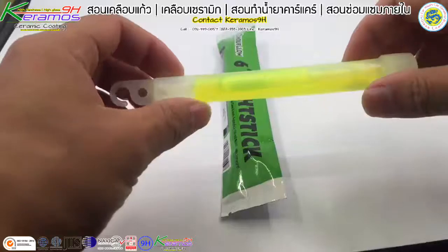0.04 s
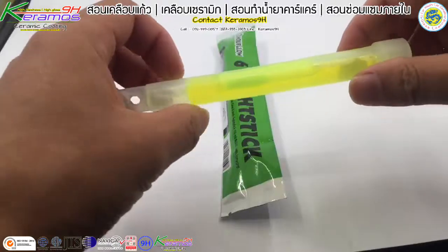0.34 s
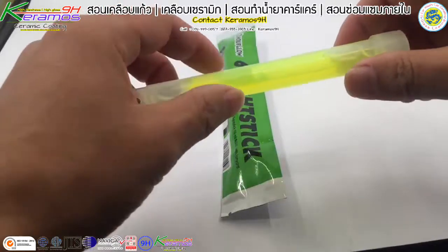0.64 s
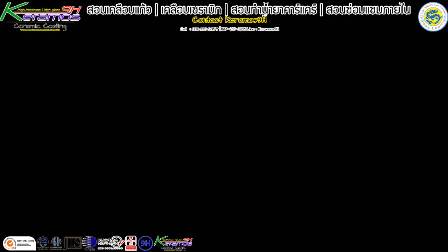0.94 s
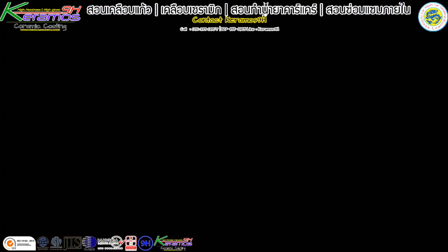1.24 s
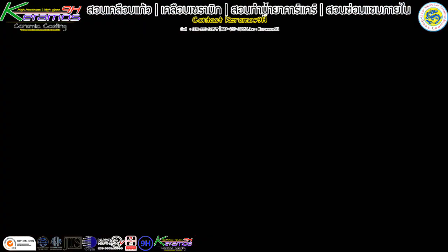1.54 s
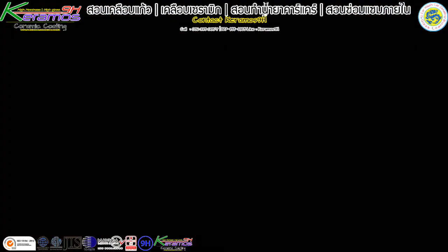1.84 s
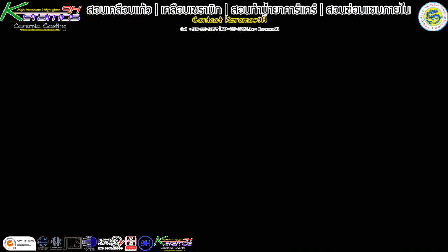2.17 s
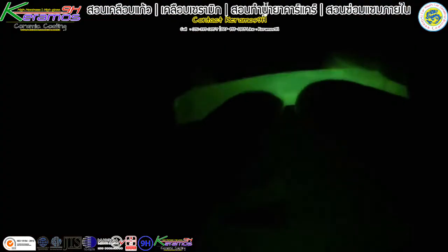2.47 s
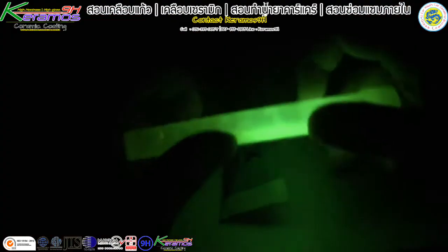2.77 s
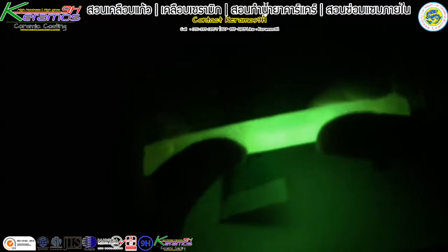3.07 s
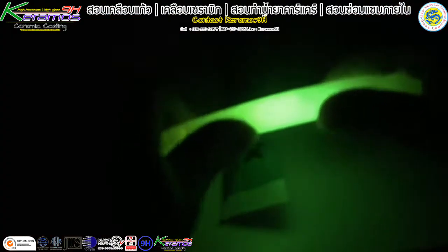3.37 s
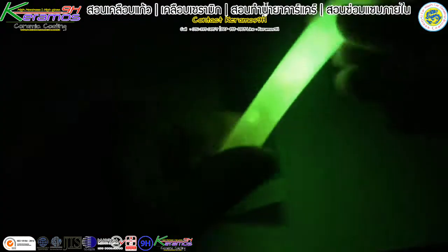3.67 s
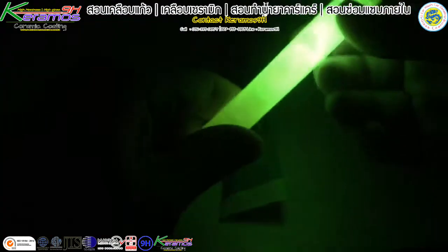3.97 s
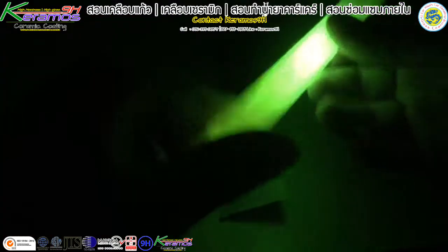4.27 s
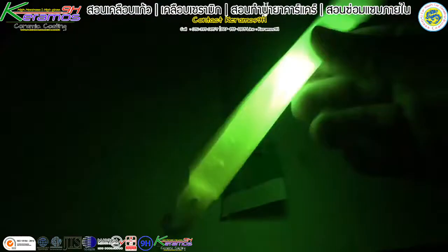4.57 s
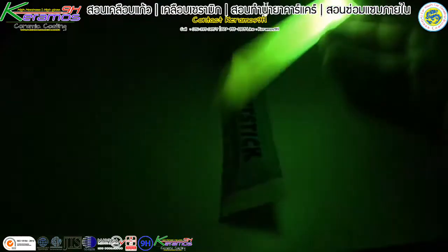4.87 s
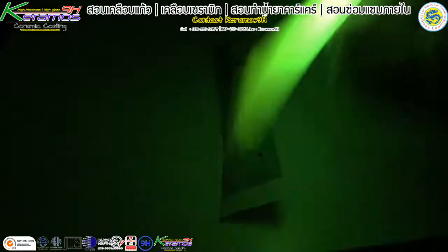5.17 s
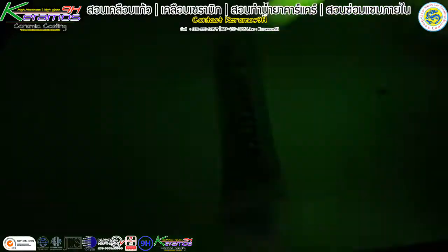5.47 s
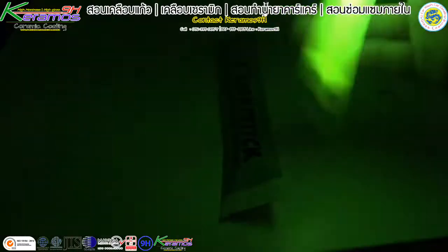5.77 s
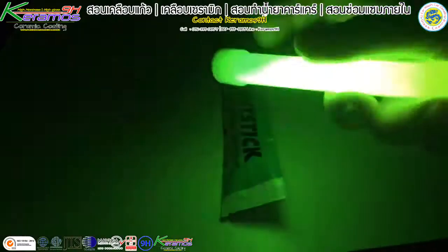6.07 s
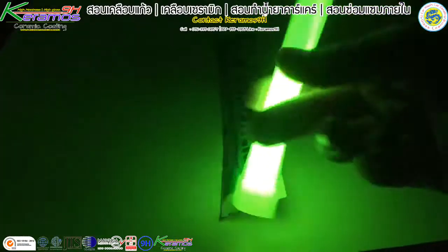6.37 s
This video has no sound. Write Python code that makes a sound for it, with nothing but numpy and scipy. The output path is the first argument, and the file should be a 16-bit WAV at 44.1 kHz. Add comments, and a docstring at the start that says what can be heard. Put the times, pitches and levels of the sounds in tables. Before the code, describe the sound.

A faint, low hum fills a small, quiet room throughout. At about 0.5 seconds a light switch clicks sharply, and a second, slightly duller click follows just before 1 second, both with a brief echo. At 2.3 seconds a glow stick is bent close to the microphone, and the glass vial inside breaks with one bright snap, the loudest sound, briefly ringing the plastic tube. A pause follows, with very faint finger rubs and tiny ticks of shifting glass from about 3.5 seconds. From 5 to 6 seconds the stick is shaken about six times a second: the broken vial knocks and scratches inside in a light rattle, strongest around 5.6 seconds, with soft sleeve rustle and dull hand bumps. A few faint rubs and ticks trail off by about 6.4 seconds.

```python
"""A small, quiet room hums faintly. Two light switches are flicked off, and their clicks echo briefly.
Then a glow stick is bent close by: the glass vial inside breaks with one sharp snap that rings the
plastic tube. After a pause the stick is shaken about six times a second. The broken vial knocks and
scratches inside, a sleeve rustles and the moving hand bumps softly."""
import sys
import numpy as np
from scipy import signal
from scipy.fft import rfft, irfft, next_fast_len
from scipy.io import wavfile

SR = 44100
rng = np.random.default_rng(int(sys.argv[2]) if len(sys.argv) > 2 else 0)


def wrap_up_sound(samples):
    """Save the sound to the file named by the first command line argument, as 16-bit audio."""
    columns = np.atleast_2d(samples).T
    # keep every value between -1 and 1, then stretch to whole-number steps
    tamed = np.clip(columns, -1, 1)
    steps = np.round(tamed * 32767).astype(np.int16)
    wavfile.write(sys.argv[1], SR, steps)


N = 282626
TIME = np.arange(N) / SR   # clock for the whole scene, in seconds
AGE = TIME[:2 ** 14]   # clock for one short sound
MIDDLE_S = AGE.mean()
FROM_MIDDLE = AGE - MIDDLE_S


def from_db(db):
    """Turn decibels into a number to multiply a sound by."""
    return 10 ** (np.asarray(db) / 20)


def rms_one(x):
    """Scale a sound so that its average strength (rms) is 1."""
    return x / np.sqrt(np.mean(x ** 2) + 1e-20)


def add(out, start_s, sound):
    """Mix a sound into out, beginning at start_s."""
    start = round(start_s * SR)
    out[start:start + len(sound)] += sound[:N - start]


def dying(fade_s):
    """Fade from 1, losing 60 dB every fade_s seconds."""
    return from_db(-60 * AGE / fade_s)


def swell(half_s):
    """A bell-shaped rise and fall, loudest at MIDDLE_S."""
    return np.exp(-(FROM_MIDDLE / half_s) ** 2 / np.sqrt(2))


def held(age, rise_s, hold_s, fall_s):
    """Rise to 1 at age 0, stay there, then die away."""
    return np.exp(-(np.minimum(age, 0) / rise_s) ** 2 - np.maximum(age - hold_s, 0) / fall_s)


def grains(count, spread_db):
    """Gritty noise: a crowd of tiny touches of uneven size."""
    return rms_one(rng.standard_normal(count) * from_db(spread_db * np.minimum(rng.exponential(1, count), 4)))


def shaped(x, curve_db, tilt_db=0):
    """Colour a sound with a curve of level against pitch. Tilt adds dB per octave above 900 Hz."""
    size = 2 * next_fast_len(len(x))
    hz = np.maximum(np.arange(size // 2 + 1) * SR / size, 1)
    gain = rms_one(from_db(curve_db(hz) + tilt_db * np.log2(np.clip(hz, 900, 16000))))
    # a minimum-phase filter: nothing rings before it is struck
    cepstrum = irfft(np.log(gain + 1e-9))
    cepstrum[1:size // 2] *= 2
    cepstrum[size // 2 + 1:] = 0
    return irfft(rfft(x, size) * np.exp(rfft(cepstrum)))[:len(x)]


def spectrum(points):
    """A curve through (pitch_hz, level_db) points that drops away below the first."""
    pitches, levels = np.transpose(points)
    return lambda hz: (np.interp(np.log(hz), np.log(pitches), levels)
                       + 40 * np.log10(np.minimum(hz / pitches[0], 1)))


def body(modes, order=1):
    """A curve with a peak at each mode, a pitch an object rings at. Higher order makes steeper peaks."""
    def curve_db(hz):
        peaks = (from_db(db) ** 2 / (1 + ((hz - pitch ** 2 / hz) / width) ** 2) ** order
                 for pitch, width, db in modes)
        return 10 * np.log10(sum(peaks) + 1e-6)
    return curve_db


# The colour of the room's background noise: pitch_hz, level_db
BACKGROUND_COLOUR = [(48, -10.5), (65, -7), (82, -11.5), (102, -2), (150, -9.5), (203, -2), (250, -7.5),
                     (340, -9), (560, -17), (900, -19.5), (1015, -17.5), (1200, -22.5), (3000, -26.5),
                     (15500, -38)]
def background(level_db=-67):
    """A faint, low, steady noise fills the room."""
    return from_db(level_db) * shaped(rng.standard_normal(N), spectrum(BACKGROUND_COLOUR))


# How hard the arm moves, given as the loudness of its sleeve: time_s, level_db
ARM_EFFORT = [(3.5, -100), (3.8, -71.5), (4.25, -82), (4.5, -66), (5.22, -70), (5.8, -60), (6.1, -69),
              (6.41, -73)]
def arm_effort():
    """The harder the arm moves, the bigger this gain."""
    return from_db(np.interp(TIME, *np.transpose(ARM_EFFORT)))


# The colour of sliding skin and cloth: pitch_hz, level_db
SLIDING_COLOUR = [(240, -44.5), (400, -12.5), (694, -6), (784, -9.5), (1420, -9), (1790, -6), (2630, -5),
                  (3850, -1.5), (4770, -6.5), (6090, -7.5), (15500, -21.5)]
# The hand slides to a new grip: start_s, length_s, level_db, tilt_db_per_octave
GRIP_CHANGES = [(.05, .45, -76.5, -2.1), (3.57, 0.049, -65.5, 5), (3.673, 0.037, -63.5, 2),
                (4.726, .1, -53.5, -1), (6.187, 0.065, -55.5, -1.3), (6.37, .03, -62, -7)]
def rustle(sleeve_tilt_db=-1):
    """The fingers rub at each change of grip, and the sleeve rustles as the arm moves."""
    slide = shaped(grains(N, spread_db=4.5), spectrum(SLIDING_COLOUR))
    low = signal.sosfiltfilt(signal.butter(2, 2600, fs=SR, output="sos"), slide)
    high = slide - low
    rubs = [(from_db(db) * held(TIME - start_s, 0.48 * length_s, length_s, 0.36 * length_s), tilt_db)
            for start_s, length_s, db, tilt_db in GRIP_CHANGES]
    low_power = high_power = 0
    for gain, tilt_db in rubs + [(arm_effort(), sleeve_tilt_db)]:
        treble_share = 1 / (1 + from_db(-2 * tilt_db) ** 4)
        low_power += 2 * (1 - treble_share) * gain ** 2
        high_power += 2 * treble_share * gain ** 2
    return low * np.sqrt(low_power) + high * np.sqrt(high_power)


def held_tube(x, ring_db, fade_s):
    """The tube rings at many close pitches, and the fingers soon stop it."""
    response = rng.standard_normal(len(AGE)) * dying(fade_s)
    ringing = signal.fftconvolve(x, response / np.linalg.norm(response))[:N]
    return (x + from_db(ring_db) * ringing) / np.sqrt(1 + from_db(2 * ring_db))


def chatter(fade_s):
    """A dying burst of tiny hits, about equally strong at every pitch."""
    envelope = dying(fade_s)
    bins = rfft(rng.standard_normal(len(AGE)) * envelope)
    # evening out the pitches smears the burst, so a gentler fade shortens it again
    burst = irfft(bins / np.abs(bins)) * np.sqrt(dying(4 * fade_s))
    return burst * np.linalg.norm(envelope) / np.linalg.norm(burst)


# Faint touches and sharp switch clicks, the loud ones in quick pairs:
# start_s, level_db, fade_s, tilt_db_per_octave
SWITCH_HITS = [(0.389, -58.5, 0.016, 0), (.508, -62.5, 0.16, -1.5), (0.5322, -16.5, 0.015, 2.5),
               (0.534, -22.5, 0.031, 1.5), (0.886, -52.5, 0.088, -1.5), (0.8973, -39.5, 0.027, -9),
               (0.899, -30.5, 0.023, -4.5), (0.9617, -23.5, 0.029, -1), (0.9638, -18, 0.017, -4.5)]
def clicks(colour):
    """The parts of each switch chatter briefly as they meet."""
    out = np.zeros(N)
    for start_s, db, fade_s, tilt_db in SWITCH_HITS:
        add(out, start_s, from_db(db) * shaped(chatter(fade_s), colour, tilt_db))
    return out


# The notes of a switch and its wall plate: pitch_hz, level_db
PLATE_MODES = [(463, -11), (750, -14), (990, 0), (1170, -1.5), (1360, 0.5), (1750, -8.5), (2100, -2.5),
               (2440, 2.5), (2850, -6), (3330, 2.5), (3780, 1.5), (4500, -10.5), (5700, -5.5), (6450, -3.5),
               (8000, -7), (9400, -10), (12000, -10.5), (14000, -15)]
def switches(sharpness=8):
    """The clicks make the wall plate ring."""
    return clicks(body([(hz, hz / sharpness, db) for hz, db in PLATE_MODES], order=2))


# The colour of the clicks as the whole wall spreads them: pitch_hz, level_db
WALL_COLOUR = [(420, -9.5), (700, -15), (900, -4), (1400, -1.5), (1750, -4), (2400, 0.5), (3700, 0),
               (4900, -12.5), (6300, -5.5), (7400, -11.5), (10000, -13), (15500, -12.5)]
def switches_into_room():
    """The wall passes the clicks on to the room."""
    return clicks(spectrum(WALL_COLOUR))


# How long the room's echo lasts: pitch_hz, fade_s
ECHO_FADES = [(150, 0.25), (1000, 0.29), (3500, 0.29), (6300, 0.28), (9000, .24), (15000, 0.18)]
def room_echo(x, build_s=0.007):
    """Sound bounces around the room. The echo builds quickly, and its highest pitches die first."""
    noise = rfft(rng.standard_normal(len(AGE)))
    hz = np.maximum(np.arange(len(noise)) * SR / len(AGE), 1)
    centres = np.log([pitch for pitch, _ in ECHO_FADES])
    bands = [np.interp(np.log(hz), centres, row) for row in np.eye(len(centres))]
    tail = sum(irfft(noise * band) * dying(fade_s) for band, (_, fade_s) in zip(bands, ECHO_FADES))
    tail *= 1 - np.exp(-(AGE / build_s) ** 2)
    return signal.fftconvolve(x, tail / np.linalg.norm(tail))[:N]


def dull_noise(count, hz, width_hz):
    """Noise gathered around one pitch."""
    band = shaped(rng.standard_normal(count), body([(hz, width_hz, 0)]))
    return rms_one(shaped(band, body([(hz, 2 * width_hz, 0)])))


# Soft bumps and faint squeaks: middle_s, half_length_s, level_db, pitch_hz, width_hz
HAND_BUMPS = [(.732, 0.0055, -55.5, 900, 500), (1.752, 0.061, -71, 1016, 47.4),
              (2.797, .099, -66, 256, 116), (3.63, .065, -67.5, 4000, 1400),
              (3.79, 0.01, -61.5, 1420, 199.6), (5.532, 0.016, -60.5, 293, 120),
              (5.715, .02, -54.5, 125, 60), (5.728, 0.0093, -52, 685, 450), (5.826, 0.016, -49, 148, 80.5),
              (5.834, 0.0058, -54.5, 480, 298), (5.96, 0.1, -62, 550, 200), (6.024, 0.031, -55.5, 388, 185)]
def handling(rumble_db=-3.5):
    """The hands bump and squeak on the stick, and the air rumbles as the arm stirs it."""
    out = from_db(rumble_db) * arm_effort() * dull_noise(N, hz=100, width_hz=100)
    for middle_s, half_s, db, hz, width_hz in HAND_BUMPS:
        add(out, middle_s - MIDDLE_S, from_db(db) * dull_noise(len(AGE), hz, width_hz) * swell(half_s))
    return out


# The vial strains, then breaks and splinters: start_s, level_db, fade_s
VIAL_CRACKS = [(2.2847, -49.5, 0.033), (2.294, -52, 0.037), (2.3058, -32.5, .02), (2.3075, -2.5, 0.014),
               (2.3096, -13.5, .06), (2.3108, -12, 0.0067)]
def cracks(colour):
    """The glass gives way in a quick run of cracks."""
    out = np.zeros(N)
    for start_s, db, fade_s in VIAL_CRACKS:
        add(out, start_s, from_db(db) * shaped(chatter(fade_s), spectrum(colour)))
    return out


SNAP_S = 2.3078   # the moment of the main break
# The colour of breaking glass heard through the tube: pitch_hz, level_db
GLASS_COLOUR = [(600, -10.5), (900, -13.5), (1400, -13), (2150, -15), (2400, -3), (3100, 0.5), (3800, 6),
                (4800, -3), (5700, 3.5), (7300, -4), (8700, 0.5), (10500, -4), (15500, -3)]
# The notes of the plastic tube: pitch_hz, level_db, fade_s
TUBE_NOTES = [(2410, -29, .08), (2670, -21.5, 0.05), (3146, -23.5, .045), (3330, -23.5, 0.05),
              (3620, -16, 0.028), (3760, -10, 0.031), (3990, -24, 0.05), (5780, -21, 0.057),
              (5850, -22.5, .035), (6600, -25, .035), (8600, -23, 0.061), (8950, -22.5, 0.068),
              (11340, -22, 0.065), (13800, -25, .04)]
def snap():
    """The vial cracks close by, and the main break makes the tube ring."""
    out = cracks(GLASS_COLOUR)
    for hz, db, fade_s in TUBE_NOTES:
        add(out, SNAP_S, from_db(db) * dying(fade_s) * np.sin(2 * np.pi * hz * AGE))
    return out


# The colour of the break as it leaves the tube sideways: pitch_hz, level_db
SIDEWAYS_COLOUR = [(300, -14), (900, -15), (2000, -14), (2450, 1.5), (2900, -4), (3500, -1), (4700, -3),
                   (5900, -2), (7300, -10.5), (9000, -8.5), (10500, -10.5), (15500, -11.5)]
def snap_into_room():
    """The cracks also spread out into the room."""
    return cracks(SIDEWAYS_COLOUR)


def thump(thump_db=-18, thump_s=0.016, jolt_db=-21, jolt_hz=420):
    """The tube gives way with a short jolt and a low thump that drops in pitch."""
    out = np.zeros(N)
    falling_tone = np.sin(2 * np.pi * np.sqrt(250 * AGE))
    add(out, SNAP_S, -from_db(thump_db) * falling_tone * np.exp(-(AGE / thump_s) ** 1.5))
    add(out, SNAP_S, -from_db(jolt_db) * np.sin(2 * np.pi * jolt_hz * AGE) * dying(0.0097))
    return out


# The notes of the tube's wall when scratched: pitch_hz, width_hz, level_db
SCRAPED_MODES = [(914, 250, -4), (2020, 560, -2.5), (2340, 73, 2.5), (3350, 590, 3), (3930, 250, 0.5),
                 (5650, 1400, -1.5), (6880, 780, -2.5), (8910, 680, -3), (11660, 400, -8),
                 (13100, 2700, -2.5)]
def scrape(envelope, tilt_db, catch_db=3, catches_per_s=700, spot_db=2.0, detune=0.034):
    """Bits of glass catch and slip as they drag along the tube."""
    catches = np.clip(rng.standard_normal(len(AGE)), -2, 2)
    friction = np.interp(AGE * catches_per_s, np.arange(len(AGE)), catches)
    grit = rms_one(grains(len(AGE), spread_db=4.5) * from_db(catch_db * friction)) * envelope
    # each scratch rings at slightly different pitches and strengths
    shifts = rng.standard_normal((len(SCRAPED_MODES), 2))
    spot = [(hz * (1 + detune * pitch_shift), width_hz, db + spot_db * level_shift)
            for (hz, width_hz, db), (pitch_shift, level_shift) in zip(SCRAPED_MODES, shifts)]
    return shaped(grit, body(spot), tilt_db)


# Single bits of glass shift: middle_s, half_length_s, level_db, tilt_db_per_octave
GLASS_SHIFTS = [(2.958, 0.0041, -65, 9), (3.949, 0.0043, -68.5, -3.5), (4.045, 0.014, -71, -4),
                (4.565, .022, -58.5, -1), (4.723, 0.02, -57.5, -1.5), (4.874, .012, -52.5, -3.5),
                (5.415, .004, -60.5, 2), (5.487, .008, -52, 0), (5.722, 0.0066, -48.5, -2),
                (6.091, 0.0046, -56, 0), (6.286, 0.0093, -57, 1.5)]
# A shake throws the glass out, it falls back, the vial lands: out_s, out_db, back_s, back_db, landing_db
SHAKE_STROKES = [(4.986, -56, 5.037, -48.5, -32.5), (5.132, -47.5, 5.176, -49, -49),
                 (5.272, -49, 5.324, -46.5, -34.5), (5.442, -51, 5.502, -45.5, -47),
                 (5.582, -46.5, 5.646, -42.5, -27), (5.745, -48, 5.8005, -43, -29.5),
                 (5.877, -56.5, 5.924, -56.5, -47)]
def scratches(slide_db=-14, growth_db=2.12, lead_s=0.01, edge_s=0.0067):
    """Single bits of glass shift now and then, and every shake drags them all out and back."""
    out = np.zeros(N)
    for count, (out_s, out_db, back_s, back_db, _) in enumerate(SHAKE_STROKES):
        throw = from_db(out_db) * held(FROM_MIDDLE, rise_s=0.006, hold_s=0.0086, fall_s=0.012)
        # the glass keeps sliding between throw and fall, more with every shake
        level_db = (out_db + back_db) / 2 + slide_db + growth_db * count
        slide = from_db(level_db) * held(FROM_MIDDLE + lead_s, edge_s, back_s - out_s + lead_s, edge_s)
        fall = from_db(back_db) * held(FROM_MIDDLE, rise_s=0.0061, hold_s=0.011, fall_s=0.0069)
        add(out, out_s - MIDDLE_S, scrape(np.hypot(throw, slide), tilt_db=-0.6))
        add(out, back_s - MIDDLE_S, scrape(fall, tilt_db=0.1))
    for middle_s, half_s, db, tilt_db in GLASS_SHIFTS:
        add(out, middle_s - MIDDLE_S, scrape(from_db(db) * swell(half_s), tilt_db))
    return out


def ping(hz, fade_cycles=23, rise_s=0.00032):
    """A struck spot on the tube gives a short, hollow note."""
    return np.sin(2 * np.pi * hz * AGE) * dying(fade_cycles / hz) * (1 - np.exp(-AGE / rise_s))


# The notes of the held tube when knocked: pitch_hz, width_hz, level_db
KNOCKED_MODES = [(880, 75, -11), (1866, 134, 0.5), (2420, 230, -1), (2800, 570, -8), (5470, 430, -6),
                 (6520, 160, -10.5), (8500, 1100, -19), (12200, 2000, -31)]
# The vial hits the end of the tube: start_s, click_db, tilt_db_per_octave, ping_db, pitch_hz
VIAL_HITS = [(4.6444, -41, -1, -38, 3270), (4.984, -45, -6.5, -46.5, 930), (5.123, -38.5, 6, -30, 3980),
             (5.155, -42, 3, -28, 2300), (5.269, -28.5, -0.5, -44, 2800), (5.271, -24.5, 0, -21.5, 2200),
             (5.427, -29, 4.5, -42, 3230), (5.4294, -36, 1, -20.5, 5400), (5.5743, -25, 2, -34, 2930),
             (5.576, -18.5, 5, -26, 2240), (5.7378, -29.5, 0, -19.5, 2220), (5.744, -27, 3.5, -31, 2240),
             (6.3588, -48, -16, -49, 2044)]
def knocks(skitter_db=-21, landing_tilt_db=7, landing_hz=2350, spot_width_hz=230, spot_db=1):
    """The vial hits the tube hard when thrown and lightly when it falls back. Loose glass skitters after."""
    out = np.zeros(N)
    throws = [(start_s, db, tilt_db, hz) for start_s, db, tilt_db, _, hz in VIAL_HITS]
    landings = [(back_s, db, landing_tilt_db, landing_hz) for _, _, back_s, _, db in SHAKE_STROKES]
    for start_s, db, tilt_db, hz in throws + landings:
        hit = chatter(fade_s=0.0052)
        skitter = from_db(skitter_db) * grains(len(AGE), spread_db=6) * dying(0.089)
        tube = body([*KNOCKED_MODES, (hz, spot_width_hz, spot_db)])
        add(out, start_s, from_db(db) * shaped(hit + skitter, tube, tilt_db))
    for start_s, _, _, ping_db, hz in VIAL_HITS:
        add(out, start_s, from_db(ping_db) * ping(hz))
    bass_cut = signal.butter(2, 1000, "high", fs=SR, output="sos")   # a thin tube gives off little bass
    return signal.sosfilt(bass_cut, out)


def wrist_thuds(relative_db=-11.5):
    """The wrist stops each throw with a soft, low thud."""
    out = np.zeros(N)
    for out_s, out_db, *_ in SHAKE_STROKES:
        thud = dull_noise(len(AGE), hz=218, width_hz=260) * swell(half_s=0.015)
        add(out, out_s - MIDDLE_S, from_db(out_db + relative_db) * thud)
    return out


def scene():
    """Mix all the sounds. The far switches get a lot of echo, the nearby stick only a little."""
    shake = held_tube(knocks(), ring_db=-8, fade_s=0.028)
    shake += held_tube(scratches(), ring_db=-3.5, fade_s=0.027)
    rubbing = held_tube(rustle(), ring_db=-3.5, fade_s=0.031)
    into_room = from_db(-11.5) * switches_into_room() + from_db(-22.5) * snap_into_room()
    echo = room_echo(into_room + from_db(-21) * shake)
    mix = background() + rubbing + switches() + echo + snap() + thump() + handling()
    return (mix + shake + wrist_thuds())[None]


def record(dry, ceiling=0.77, cutoff_hz=15800):
    """Round off the loudest peaks and cut the very highest pitches."""
    rounded = dry / (1 + (dry / ceiling) ** 4) ** .25
    return signal.sosfilt(signal.ellip(10, .1, 80, cutoff_hz, fs=SR, output="sos"), rounded)


dry = scene()
out = record(dry)
wrap_up_sound(out)
```